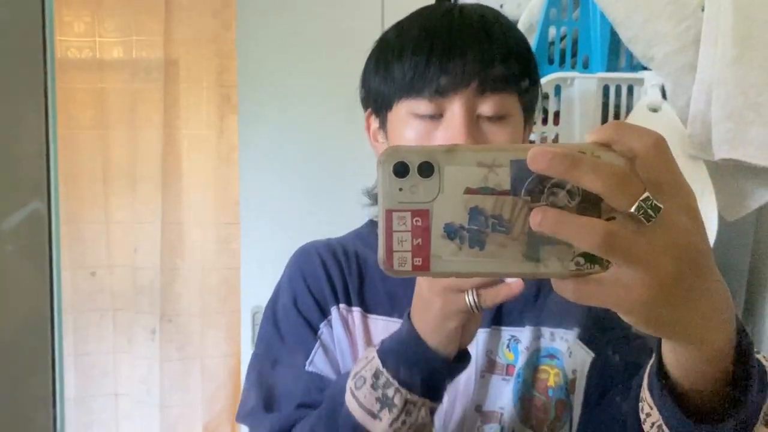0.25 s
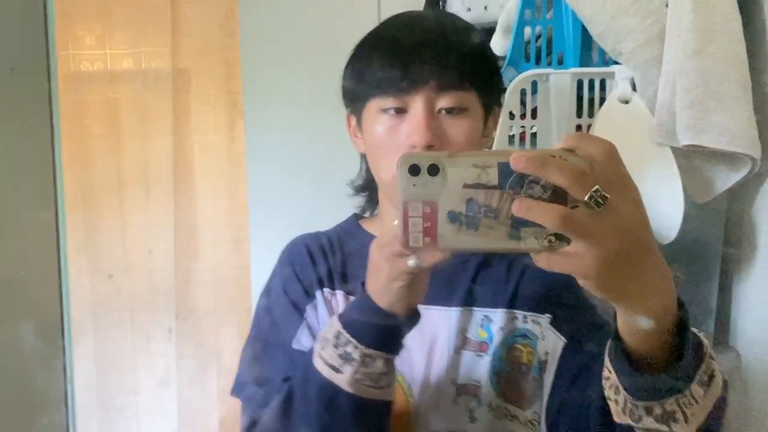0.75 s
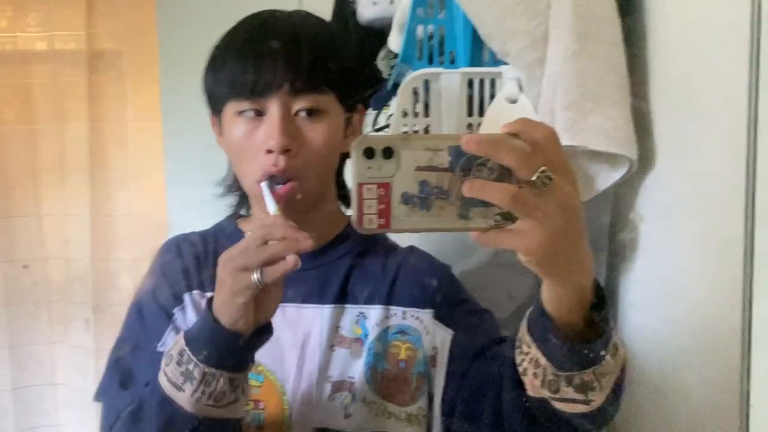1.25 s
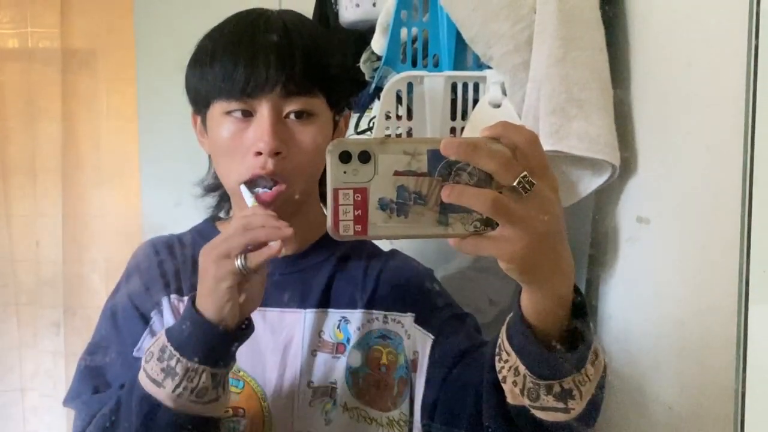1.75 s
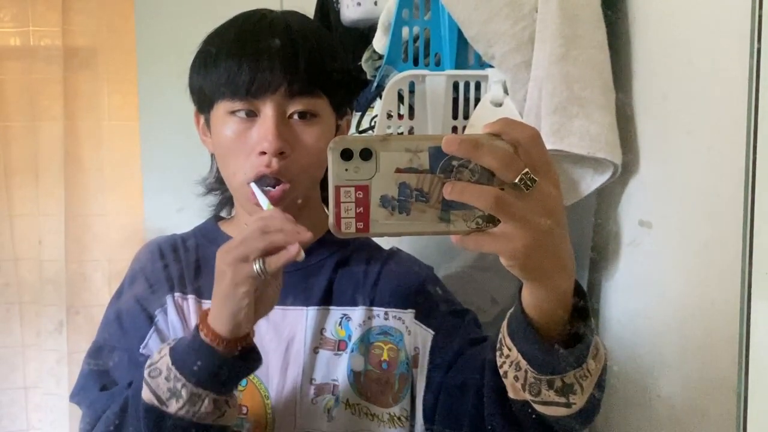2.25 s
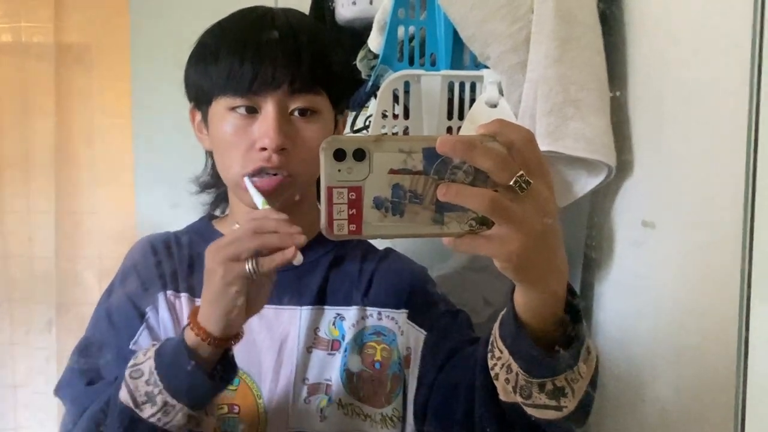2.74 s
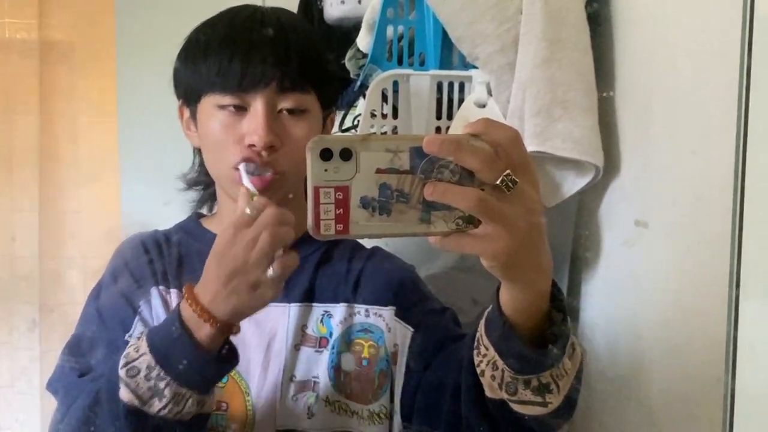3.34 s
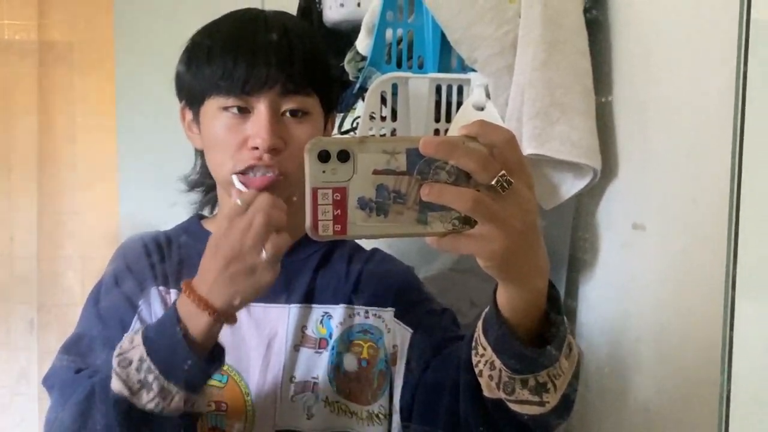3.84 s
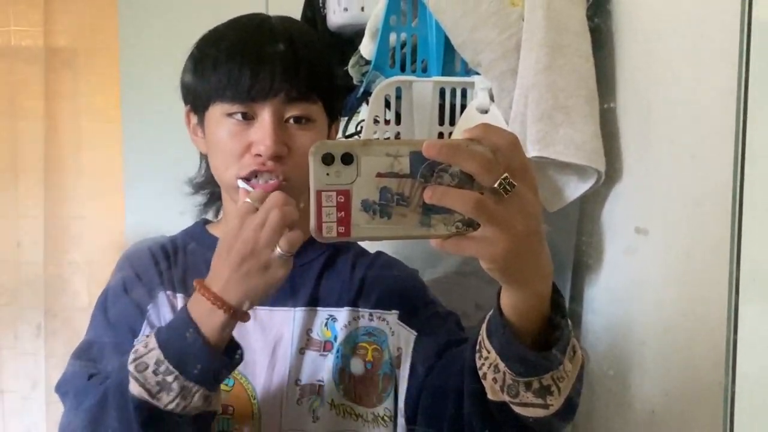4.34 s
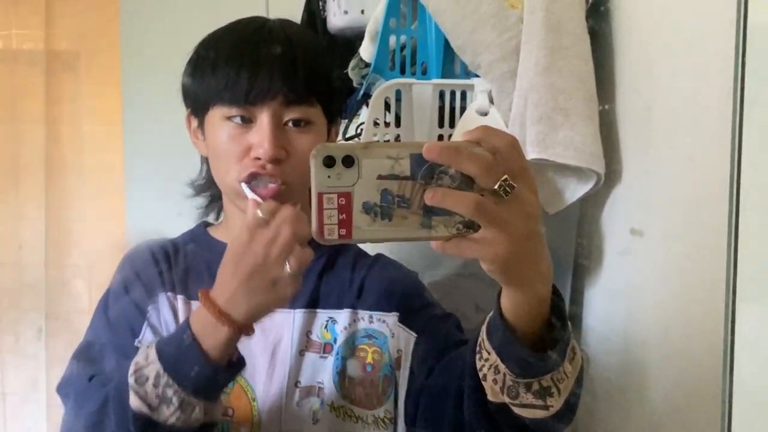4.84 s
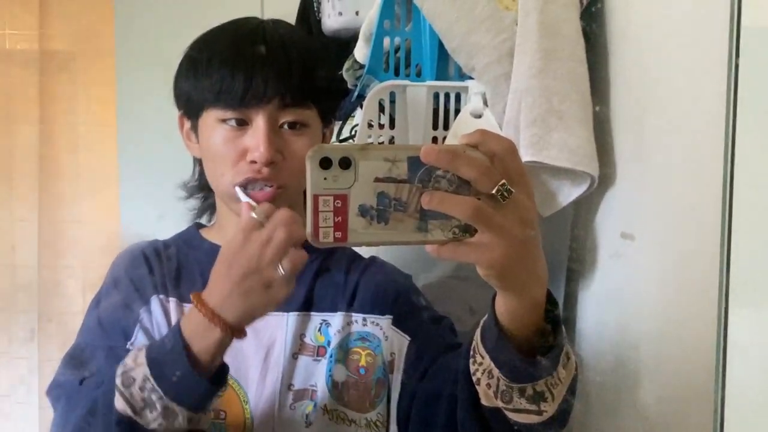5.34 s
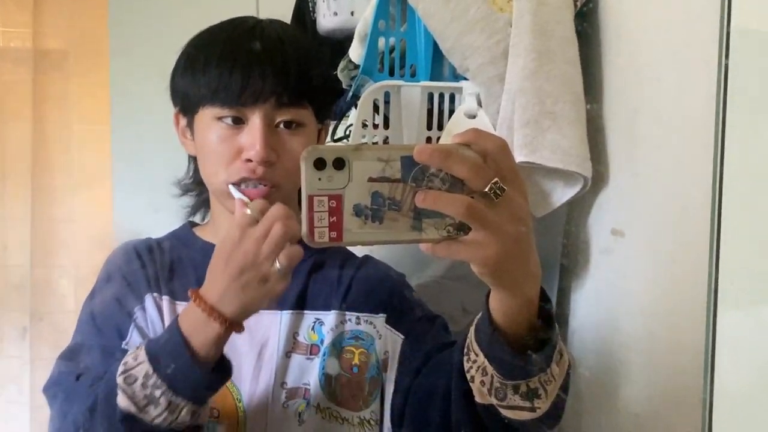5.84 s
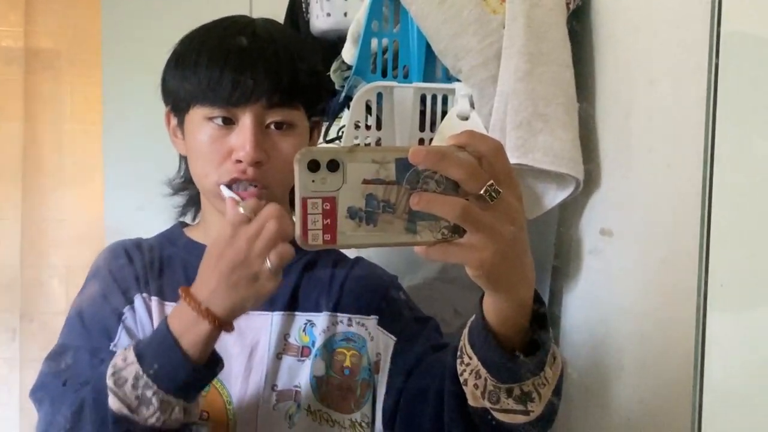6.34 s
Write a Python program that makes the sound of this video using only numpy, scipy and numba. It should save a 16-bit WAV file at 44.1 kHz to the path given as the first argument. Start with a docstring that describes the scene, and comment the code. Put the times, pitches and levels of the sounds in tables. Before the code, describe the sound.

A manual toothbrush scrubs teeth close to the microphone in a small bathroom. The bristles hiss back and forth, ringing hollowly in the open mouth, and the plastic head knocks on a tooth now and then. About halfway the brushing stops briefly, then resumes harder and slightly higher in pitch. A low, wavering motor hum comes through the wall throughout.

```python
"""A motor drones through the wall of a small bathroom while teeth are scrubbed close to a mirror.
Bristles flick over the front teeth in quick strokes, hissing and ringing the open mouth, whose pitch
moves with the brush; the plastic head knocks now and then. A wet pocket plops at the lips at 0.7 s.
The brush moves to one side at 1.1 s, and the motor comes up to speed. Near 3 s the brush pauses,
knocks, and goes on harder on the other side."""
import sys
import numpy as np
from scipy import signal
from scipy.fft import rfft, irfft, next_fast_len
from scipy.io import wavfile
from numba import njit

SR = 44100
rng = np.random.default_rng(int(sys.argv[2]) if len(sys.argv) > 2 else 0)


def wav_record(signal):
    """Record a signal, one row per channel, as 16-bit PCM in the file named by sys.argv[1]."""
    frames = np.transpose(np.atleast_2d(signal))
    bounded = np.clip(frames, -1, 1)
    # unit amplitude maps onto the largest positive 16-bit level
    quanta = np.round(bounded * 32767).astype(np.int16)
    wavfile.write(sys.argv[1], SR, quanta)


N = 290486
TIME_S = np.arange(N) / SR
FFT_SIZE = next_fast_len(N + SR // 2)
BINS_HZ = np.arange(FFT_SIZE // 2 + 1) * SR / FFT_SIZE
LEFT_RIGHT = np.array([[1], [-1]])
FIRST_SIDE_S, SECOND_SIDE_S = 1.14, 2.8

# strokes, push and pull in turn: start_s, mouth_db, hiss_db
STROKES = [(-0.02, -48, -54), (0.072, -52, -56.5), (0.195, -49.5, -53), (0.319, -47, -53),
           (0.443, -54, -54), (0.574, -50, -54), (0.754, -51, -54), (0.916, -53, -53), (1.132, -52, -54.5),
           (1.307, -47, -51.5), (1.431, -49, -50.5), (1.53, -46.5, -48.5), (1.644, -49.5, -48.5),
           (1.744, -47, -49), (1.845, -49, -47.5), (1.947, -49.5, -50), (2.051, -48, -48.5),
           (2.16, -46, -50), (2.264, -48, -50), (2.366, -46, -49.5), (2.45, -48.5, -51),
           (2.55, -48.5, -50.5), (2.632, -46, -51.5), (2.735, -55.5, -57), (2.89, -61.5, -69),
           (2.96, -87, -74), (3.06, -74, -75), (3.18, -51.5, -59), (3.29, -44, -45.5), (3.419, -48, -49.5),
           (3.526, -45.5, -51.5), (3.635, -40.5, -51.5), (3.74, -39.5, -46), (3.844, -40.5, -50.5),
           (3.945, -41, -47.5), (4.058, -38, -50.5), (4.165, -38.5, -45), (4.28, -40, -51),
           (4.389, -39, -47), (4.5, -41, -50), (4.607, -40, -44.5), (4.727, -44.5, -47.5),
           (4.833, -43.5, -45.5), (4.939, -46, -51), (5.05, -42, -45), (5.152, -45.5, -53),
           (5.25, -42.5, -47.5), (5.367, -44, -53), (5.472, -44.5, -46.5), (5.584, -49, -55),
           (5.683, -42, -47), (5.804, -45, -52.5), (5.926, -46.5, -46.5), (6.039, -45, -51.5),
           (6.149, -41, -46), (6.245, -42.5, -52), (6.365, -40.5, -47), (6.481, -64, -60.5)]
# hiss spectrum on the second side, also of ticks and foam: freq_hz, level_db
SECOND_SIDE_SPECTRUM = [(500, -15.5), (1300, -4), (2100, -2), (2800, -3), (3300, 1.5), (4200, -3.5),
                        (4850, -2), (5600, -1.5), (7300, -6.5), (9000, -12.5), (10300, -11), (12000, -17.5),
                        (15500, -21.5)]


def from_db(db):
    """Decibels to gain."""
    return 10 ** (np.asarray(db) / 20)


def rms_one(x):
    """Scale to an rms of 1."""
    return x / np.sqrt(np.mean(x ** 2) + 1e-20)


def over_time(points):
    """A time curve at every sample."""
    return np.interp(TIME_S, *np.transpose(points))


def over_bins(points):
    """A curve over log frequency at every bin."""
    hz, value = np.transpose(points)
    return np.interp(np.log(BINS_HZ + 1), np.log(hz), value)


def filtered(x, response):
    """Apply a frequency response."""
    return irfft(rfft(x, FFT_SIZE) * response, FFT_SIZE)[..., :N]


def coloured(x, spectrum):
    """Minimum-phase filter with the given spectrum."""
    cepstrum = irfft(np.log(from_db(over_bins(spectrum))), FFT_SIZE)
    cepstrum[1:FFT_SIZE // 2] *= 2
    cepstrum[FFT_SIZE // 2 + 1:] = 0
    return filtered(x, np.exp(rfft(cepstrum)))


def drift(rate_hz):
    """Slow random wander, rms 1."""
    return rms_one(filtered(rng.standard_normal(N), 1 / (1 + (BINS_HZ / rate_hz) ** 4)))


@njit
def resonate(x, hz, width_hz):
    """Resonance with a moving centre and peak gain 1."""
    y, r = np.zeros(len(x)), np.exp(-np.pi * width_hz / SR)
    for i in range(2, len(x)):
        feedback = 2 * r * np.cos(2 * np.pi * hz[i] / SR) * y[i - 1] - r * r * y[i - 2]
        y[i] = (1 - r * r) / 2 * (x[i] - x[i - 2]) + feedback
    return y


def cascade(x, hz, widths_hz):
    """Resonances in series on one centre, rms 1."""
    for width_hz in widths_hz:
        x = resonate(x, hz, width_hz)
    return rms_one(x)


def motor():
    """A wavering hum with a weak octave comes up to speed over an uneven low throb."""
    # run-up: time_s, pitch_hz
    run_up = [(0, 101), (1.35, 99.8), (1.6, 107.8), (2.2, 109), (3.5, 110), (6.59, 109.9)]
    # hum loudness: time_s, level_db
    hum_level = [(0, -54), (1.4, -55), (1.65, -52), (1.87, -58.5), (2.08, -49), (2.27, -67), (2.5, -48.5),
                 (2.77, -57), (3.0, -50), (3.3, -58), (3.48, -52.5), (4.0, -59.5), (4.2, -49.5),
                 (4.37, -62.5), (4.62, -47.5), (4.85, -55.5), (5.95, -54.5), (6.2, -50.5), (6.59, -50)]
    hum_hz = over_time(run_up) * (1 + 0.0075 * drift(4.67))
    phase = 2 * np.pi * np.cumsum(hum_hz) / SR
    hum = (np.sin(phase) + from_db(-24.5) * np.sin(2 * phase)) * from_db(2.9 * drift(12.5))
    throb = cascade(rng.standard_normal(N), hz=np.full(N, 85.), widths_hz=(10., 22.4))
    return from_db(over_time(hum_level)) * rms_one(hum) + from_db(-56) * throb


def room_air(level_db):
    """Steady rumble and air, alike left and right in the bass."""
    # air spectrum: freq_hz, level_db
    spectrum = [(22, -18), (31, -14), (40, -1), (65, 1.5), (140, 0.5), (185, -11), (330, -17.5),
                (400, -20.5), (550, -18), (690, -19), (850, -27.5), (1500, -28), (4000, -41), (15000, -62)]
    # left-right likeness: freq_hz, correlation
    likeness = [(30, 0.9), (140, 0.74), (300, 0.33), (600, 0.31), (2000, 0.066), (15000, 0.34)]
    colour, alike = from_db(over_bins(spectrum)), over_bins(likeness)
    mid = filtered(rng.standard_normal(N), colour * np.sqrt(1 + alike))
    side = filtered(rng.standard_normal(N), colour * np.sqrt(1 - alike))
    return from_db(level_db) * rms_one(mid + side * LEFT_RIGHT)


def push_pull(pair):
    """A (push, pull) pair repeated over all strokes."""
    return np.resize(pair, len(STROKES))


def stroke_times(share):
    """When each stroke has run the given share of its length."""
    turns_s = np.array(STROKES)[:, 0]
    return turns_s + share * np.diff(np.r_[turns_s, N / SR])


def swing(push, pull):
    """A curve that reaches each value at mid-stroke."""
    return np.interp(TIME_S, stroke_times(.5), push_pull((push, pull)))


def friction(crest_db, crest_share, rest_db, sharpness):
    """Friction follows brush speed: least at the turns, most at the crest. Pairs are (push, pull)."""
    turns_s = stroke_times(0)
    knots_s = np.sort(np.r_[turns_s, stroke_times(push_pull(crest_share)), N / SR])
    progress = np.interp(TIME_S, knots_s, np.arange(len(knots_s)) / 2)
    stroke = np.minimum(progress.astype(int), len(turns_s) - 1)
    arch = from_db(crest_db)[stroke] * np.abs(np.sin(np.pi * progress)) ** sharpness
    # a turn partly follows its weaker stroke and stays below it
    weaker_db = np.minimum(crest_db, np.r_[crest_db[0], crest_db[:-1]])
    turn_db = np.minimum(push_pull(rest_db) + 0.53 * (weaker_db + 47.5), weaker_db - 9.5)
    return np.hypot(arch, from_db(np.interp(TIME_S, turns_s, turn_db)))


def flicks(per_s, spread_db, rubbing):
    """Bristles snap free at random with uneven strength, over smooth rubbing."""
    sizes = from_db(spread_db * np.minimum(rng.exponential(1, N), 4)) * rng.choice([-1, 1], N)
    snaps = rms_one(sizes * (rng.random(N) < per_s / SR))
    return rms_one(snaps + rubbing * rng.standard_normal(N))


def mouth_pitch():
    """The mouth's opening sets its pitch; each stroke bends it by filling or freeing the cavity."""
    # main resonance: time_s, pitch_hz
    resonance = [(0.0, 1073), (0.51, 1060), (0.7, 1190), (0.81, 1080), (1.28, 1120), (1.34, 1203),
                 (2.57, 1150), (2.6, 1240), (2.84, 1196), (2.88, 1443), (4.42, 1363), (4.51, 1310),
                 (5.34, 1322), (5.58, 1193), (5.72, 1280), (6.59, 1362)]
    knots_s = np.c_[stroke_times(.25), stroke_times(.75)].ravel()
    bend_hz = np.outer(push_pull((-49, 8)), [-.5, .5]).ravel()
    return over_time(resonance) + np.interp(TIME_S, knots_s, bend_hz)


def mouth_ring(drive):
    """Flicks ring two mouth resonances; pulls bring out the upper one."""
    # upper resonance against the main one: time_s, level_db
    upper_level = [(0, -12), (.9, -23.5), (1.7, -17.5), (2.7, -16.5), (3.22, -3.5), (3.52, -12), (3.7, -9),
                   (4.66, -6), (4.8, -10), (6.59, -14)]
    mouth_hz = mouth_pitch()
    gliding_hz = mouth_hz * (1 + 0.011 * drift(15))   # the brush head reshapes the cavity
    narrow = cascade(drive, gliding_hz, widths_hz=(150., 720., 970.))
    wide = cascade(drive, mouth_hz, widths_hz=(257., 367.))
    main = np.where(TIME_S < SECOND_SIDE_S, narrow, wide)   # wider lips damp the mouth more
    upper = cascade(drive, mouth_hz * 1.587, widths_hz=(440., 930.))
    return main + upper * from_db(over_time(upper_level) + swing(push=-3, pull=1.5))


def bristle_hiss():
    """Dense flicks coloured by the place in the mouth and its resonances; fine tips add treble."""
    # hiss spectra at the front and on the first side: freq_hz, level_db
    front_spectrum = [(500, -33), (1300, -3), (2100, -12), (2600, -5.5), (2950, -8.5), (3400, 2),
                      (4200, -18), (5400, -9.5), (6400, -1), (7300, -9.5), (8200, -11.5), (10000, -15.5),
                      (12000, -20.5), (15500, -30)]
    first_side_spectrum = [(500, -7), (1300, -8.5), (2100, -2.5), (2800, 3), (3300, -4.5), (4000, -4),
                           (4700, -4.5), (5600, -7), (6500, 3.5), (7600, -7), (9000, -10.5), (12000, -13),
                           (15500, -22.1)]
    # higher mouth resonances, a row per place: third_hz, fourth_hz, fifth_hz
    mouth_modes = [(3500, 4700, 6280), (3330, 4620, 6580), (3234.5, 4780, 7130)]
    # treble of the tips: time_s, level_db
    tip_level = [(0, -4), (.6, 1.5), (1.05, 3), (1.6, -1.5), (2.7, 2), (3.1, -4), (3.5, -1.5), (3.8, 1),
                 (5.55, 2.5), (6.59, 0.5)]
    tip_db = over_time(tip_level) + swing(push=0.25, pull=2)
    treble_share = BINS_HZ ** 6 / (BINS_HZ ** 6 + 5700. ** 6)
    coarse = filtered(flicks(per_s=2600, spread_db=3, rubbing=0.6), np.sqrt(1 - treble_share))
    coarse *= from_db(1.36 * drift(49))
    fine = filtered(flicks(per_s=9000, spread_db=4, rubbing=0.7), np.sqrt(treble_share))
    fine *= from_db(tip_db + 0.8 * drift(38))
    place = np.searchsorted([FIRST_SIDE_S, SECOND_SIDE_S], TIME_S)
    spectra = front_spectrum, first_side_spectrum, SECOND_SIDE_SPECTRUM
    hiss = np.choose(place, [rms_one(coloured(coarse + fine, spectrum)) for spectrum in spectra])
    modes_hz = np.array(mouth_modes)[place].T
    rings = sum(resonate(hiss, hz * (1 + 0.043 * drift(8.5)), width_hz=300.) for hz in modes_hz)
    foam = rms_one(coloured(flicks(per_s=220, spread_db=3.5, rubbing=0), SECOND_SIDE_SPECTRUM))
    return rms_one(hand_echo(hiss + from_db(-4) * rings + from_db(-6) * foam))


def hand_echo(x):
    """The moving hand returns a very short echo, sliding notches through the hiss."""
    delay_s = 0.0008066 * (1 + .12 * drift(5.73))
    return x + from_db(-7) * np.interp(TIME_S - delay_s, TIME_S, x)


def brushing():
    """Tufts catch on the gaps between teeth and slip; ring and hiss swell with each stroke."""
    _, mouth_db, hiss_db = np.transpose(STROKES)
    catching = from_db(1.86 * drift(93))
    ring = mouth_ring(flicks(per_s=1800, spread_db=3, rubbing=0.61) * catching)
    ring *= friction(mouth_db - .93, crest_share=(.54, .44), rest_db=(-64.5, -59.5), sharpness=1.67)
    hiss = bristle_hiss() * catching
    # the brush nearly stops before a push but swings straight into a pull
    hiss *= friction(hiss_db - .4, crest_share=(.65, .33), rest_db=(-65, -59), sharpness=1.43)
    return ring + hiss


def through_lips(x, corner_hz):
    """The small lip opening radiates little below the main resonance."""
    return signal.sosfilt(signal.butter(2, corner_hz, "high", fs=SR, output="sos"), x)


def knocks(attack_s, ring_s, upper_ring_s, tick_s, upper_ratio):
    """Hard plastic meets a tooth: a bright tick and a short ring of two mouth resonances."""
    # brush head on teeth: start_s, main_db, upper_db, tick_db
    hits = [(0.0984, -36.5, -52, -60), (1.1508, -58, -59, -44.5), (1.7094, -38, -37, -35),
            (2.520, -35, -55, -52), (2.871, -59, -60, -46.5), (2.877, -51, -63, -49),
            (3.057, -36.5, -27, -49), (3.316, -32, -28, -48), (3.36, -26, -37, -33),
            (3.5514, -36.5, -38, -43), (3.6614, -25, -19, -45), (4.198, -34, -38, -54),
            (4.438, -24, -33, -50), (4.5436, -24.5, -31, -51), (5.5166, -26.5, -49, -48),
            (5.5508, -35, -48, -34), (5.736, -28.5, -38, -46), (5.972, -32, -49, -49),
            (6.410, -27.5, -44, -51), (6.5112, -34, -54, -43.5)]
    rings, tick_envelope, mouth_hz = np.zeros(N), np.zeros(N), mouth_pitch()
    for start_s, main_db, upper_db, tick_db in hits:
        start = round(start_s * SR)
        age_s = TIME_S[:min(N - start, SR // 20)]
        span = slice(start, start + len(age_s))
        phase = 2 * np.pi * mouth_hz[start] * age_s
        main = from_db(main_db) * np.sin(phase) * np.exp(-age_s / ring_s)
        upper = from_db(upper_db) * np.sin(upper_ratio * phase) * np.exp(-age_s / upper_ring_s)
        rings[span] += (main + upper) * (1 - np.exp(-age_s / attack_s))
        tick_envelope[span] += from_db(tick_db) * np.exp(-age_s / tick_s)
    return rings + .5 * tick_envelope * rms_one(coloured(rng.standard_normal(N), SECOND_SIDE_SPECTRUM))


def plop(start_s, start_hz, end_hz, glide_s, level_db, decay_s):
    """A wet pocket opens at the lips; its pitch drops as it widens."""
    age_s = np.maximum(TIME_S - start_s, 0)
    hz = end_hz + (start_hz - end_hz) * np.exp(-age_s / glide_s)
    phase = 2 * np.pi * np.cumsum(hz * (age_s > 0)) / SR
    return from_db(level_db) * np.sin(phase) * np.exp(-age_s / decay_s)


def early_echoes(x):
    """Mirror and close walls comb the spectrum."""
    # first reflections: delay_ms, level_db
    echoes = [(.8, -25.5), (1.47, -18.5), (3.45, -15), (4.6, -16), (6.5, -28), (10.6, -17.5)]
    comb = 1 + sum(from_db(db) * np.exp(-2j * np.pi * BINS_HZ * ms / 1000) for ms, db in echoes)
    power = 1 + sum(from_db(db) ** 2 for _, db in echoes)
    return filtered(x, comb / np.sqrt(power))


def standing_waves(x):
    """Narrow room resonances lift steady pitches out of any noise."""
    # room modes: pitch_hz, width_hz, level_db
    modes = [(216, 12, -3.5), (336, 14, 1), (547, 29, 5), (688, 33, 2), (1205, 20, -11.5),
             (1320, 9.3, -24.5), (1775, 65, 1), (1895, 83, -5), (2103, 18, -2), (3146, 54, 5.5),
             (3310, 27, -18), (3460, 5.8, -26), (3788, 51, 1.5), (4183, 85, 5), (4830, 12, -19),
             (4830, 13, 3), (4890, 46, -4.5), (4930, 33, -9), (5320, 26, -8.5)]
    peaks = sum(from_db(db) / (1 + 2j * (BINS_HZ - hz) / width_hz) for hz, width_hz, db in modes)
    return filtered(x, 1 + peaks)


def stereo_image(x, screened):
    """Left-right level and phase vary with frequency; the treble's phase pattern is alike throughout."""
    # stereo balance: freq_hz, left_minus_right_db
    balance = [(500, 9), (1200, -1), (1800, -8), (2500, -12.5), (2880, 15), (3250, -7.5), (4600, 1),
               (6300, -5.5), (7200, -10.5), (8700, 3), (15000, -1.5)]
    # stereo phase, mouth screened, then brush on each side: freq_hz, left_lead_rad
    lead_screened = [(100, .1), (1500, .7), (3000, 2.2), (4700, 2.3), (5500, 3.2), (7400, 4.9), (8200, 4.6),
                     (9200, 3.14), (11200, 0), (13200, -3.14), (15000, -6.28)]
    lead_first_side = [(100, .1), (900, 1.5), (1500, .7), (2000, 2.6), (3300, 4.9), (4200, 6.2),
                       (4900, 7.6), (5500, 9.3), (6500, 10.6), (7400, 12.4), (8200, 10.9), (9200, 9.42),
                       (11200, 6.28), (13200, 3.14), (15000, 0)]
    lead_second_side = [(100, .1), (900, 1.8), (1500, .5), (2000, 2.4), (3300, 4.6), (4900, 6.6),
                        (5600, 8.2), (6400, 6.4), (8200, 4.6), (9200, 3.14), (11200, 0), (13200, -3.14),
                        (15000, -6.28)]
    gains = from_db(over_bins(balance) / 2 * LEFT_RIGHT)
    gains /= np.sqrt(np.mean(gains ** 2, axis=0))
    second_side = TIME_S > SECOND_SIDE_S
    positions = [(screened * from_db(-1), lead_screened),
                 ((1 - screened) * ~second_side * from_db(-0.14), lead_first_side),
                 (second_side * from_db(-1.09), lead_second_side)]
    return sum(filtered(x * weight, gains * np.exp(.5j * over_bins(lead) * LEFT_RIGHT))
               for weight, lead in positions)


def bathroom_tail(x, t60_s, lowpass_hz):
    """A short diffuse tail, different left and right."""
    age_s = TIME_S[:SR // 2]
    tail = rng.standard_normal((2, len(age_s))) * from_db(-60 * age_s / t60_s) * (age_s > .003)
    tail /= np.sqrt(np.sum(tail ** 2, axis=1, keepdims=True))
    return filtered(x, rfft(tail, FFT_SIZE) / (1 + 1j * BINS_HZ / lowpass_hz))


def scene():
    """Brushing in the room, with the drone behind it."""
    # balance of motor and air: freq_hz, left_minus_right_db
    drone_balance = [(35, 4), (85, -2.5), (170, -2.5), (280, 0.5), (600, 0)]
    scrub = from_db(.5) * through_lips(brushing(), corner_hz=833)
    scrub += knocks(attack_s=.00052, ring_s=.0031, upper_ring_s=.00093, tick_s=.0038, upper_ratio=1.526)
    near = standing_waves(early_echoes(scrub))
    near += plop(start_s=.7028, start_hz=1000, end_hz=150, glide_s=.0033, level_db=-49, decay_s=.017)
    # at first hand and microphone screen the mouth, so more sound comes by the walls
    screened = np.interp(TIME_S, [.9, 1.15], [1, 0])
    room = bathroom_tail(near * from_db(-7.5 + 2.9 * screened), t60_s=0.089, lowpass_hz=7350)
    room *= from_db(-1.2 * LEFT_RIGHT)
    air = room_air(level_db=-54)
    # the standing waves come in fully once the microphone has moved aside
    air += (standing_waves(air) - air) * (1 - 0.77 * screened)
    drone = filtered(motor() + air, from_db(over_bins(drone_balance) / 2 * LEFT_RIGHT))
    return stereo_image(near, screened) + room + drone


def record(dry):
    """Steep treble cut."""
    cutoff_hz = 15750
    return filtered(dry, 1 / np.sqrt(1 + np.minimum(BINS_HZ / cutoff_hz, 1.1) ** 1000))


dry = scene()
out = record(dry)
wav_record(out)
```